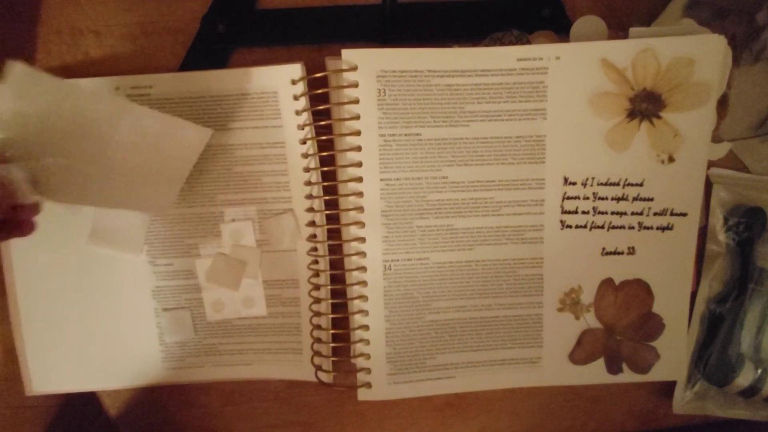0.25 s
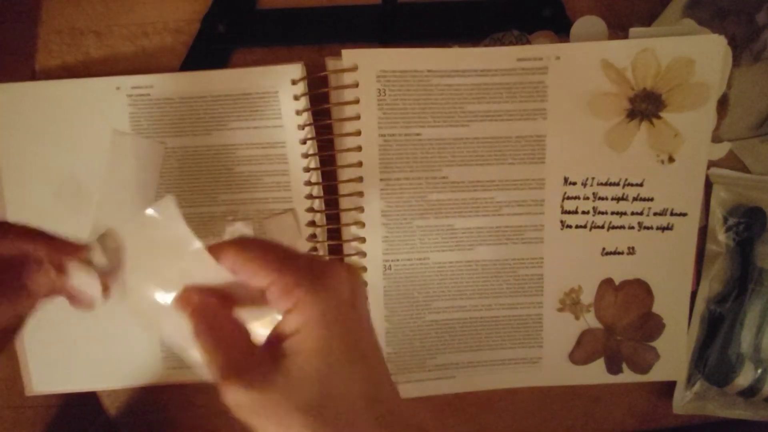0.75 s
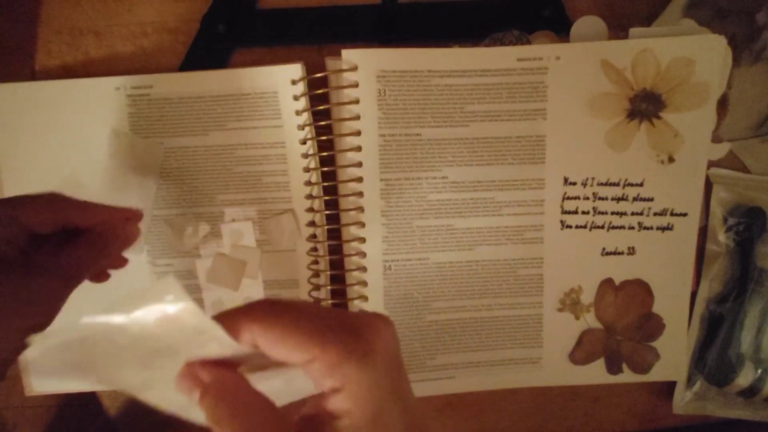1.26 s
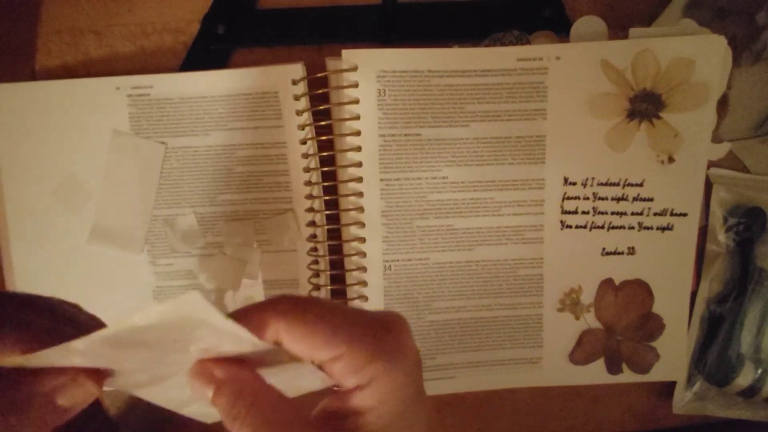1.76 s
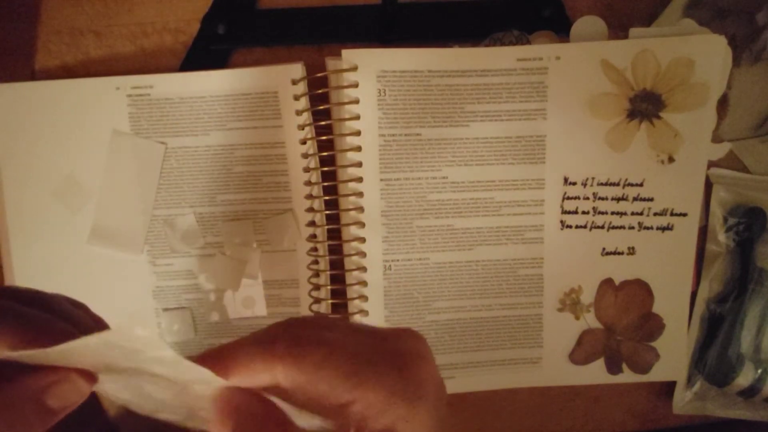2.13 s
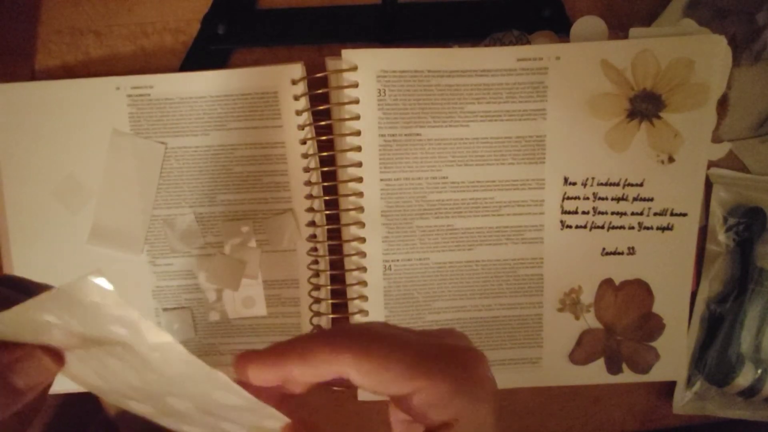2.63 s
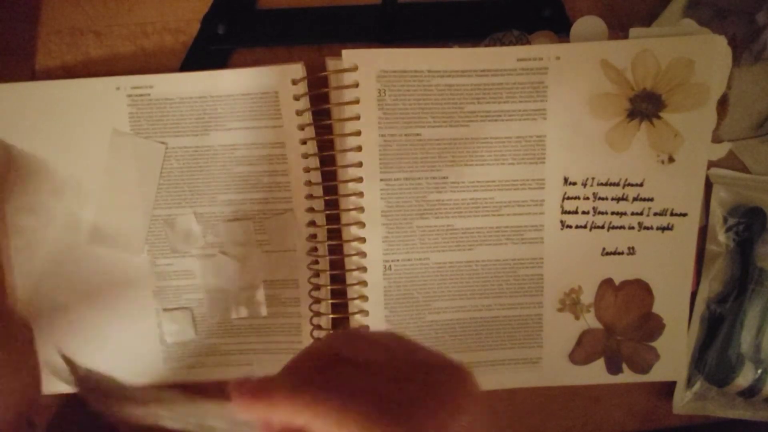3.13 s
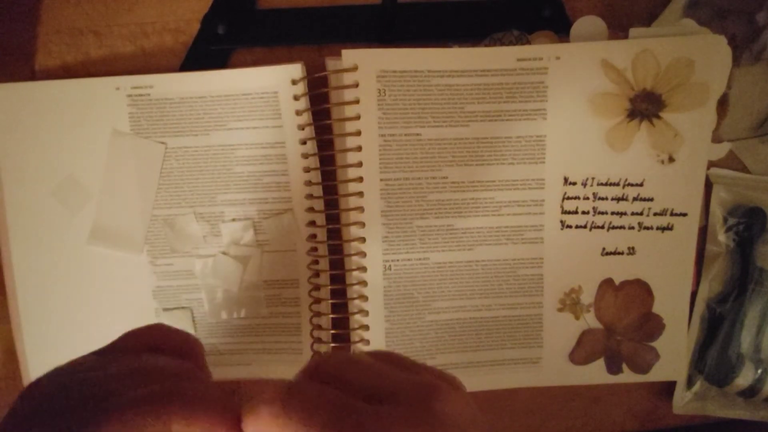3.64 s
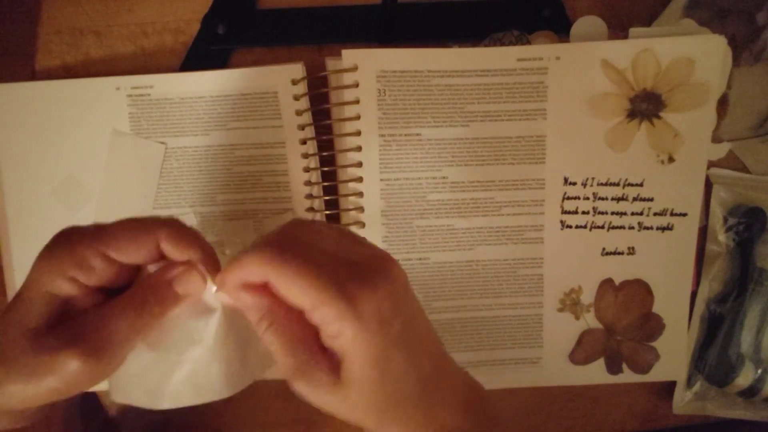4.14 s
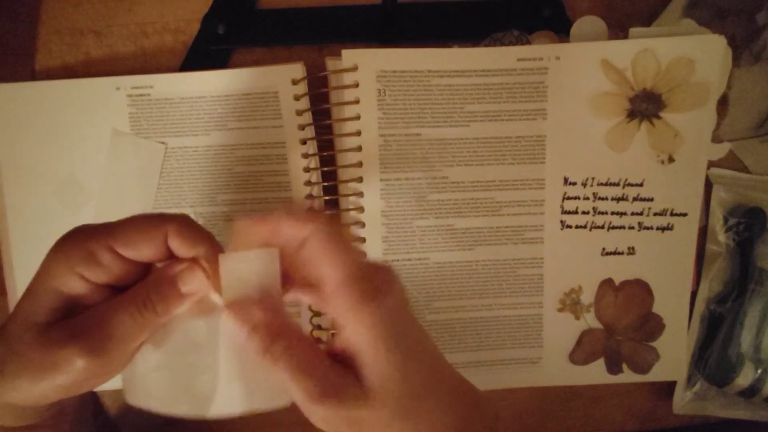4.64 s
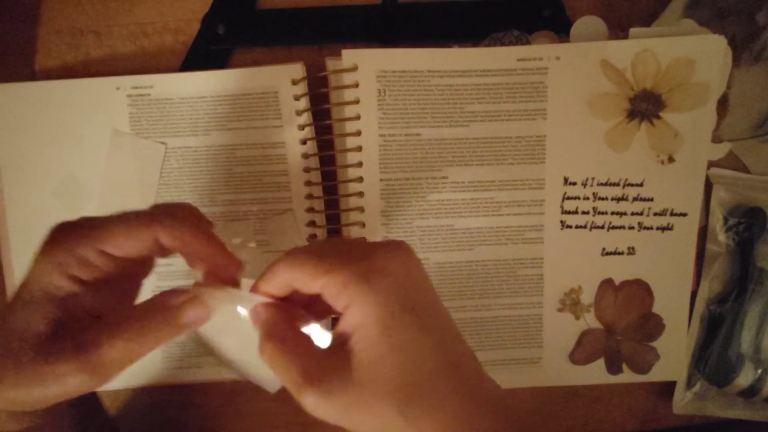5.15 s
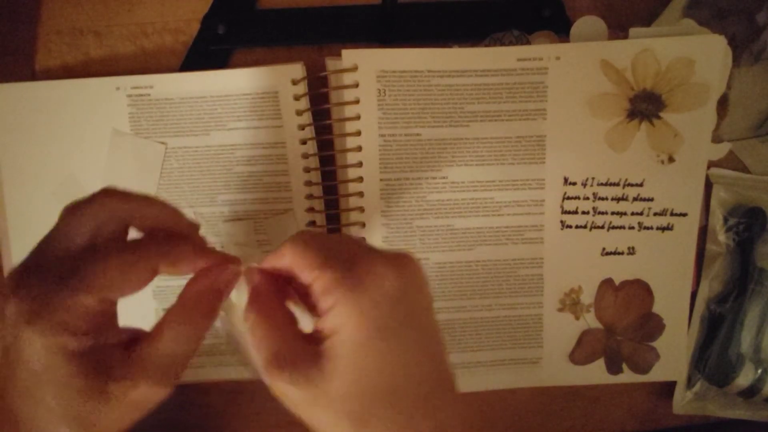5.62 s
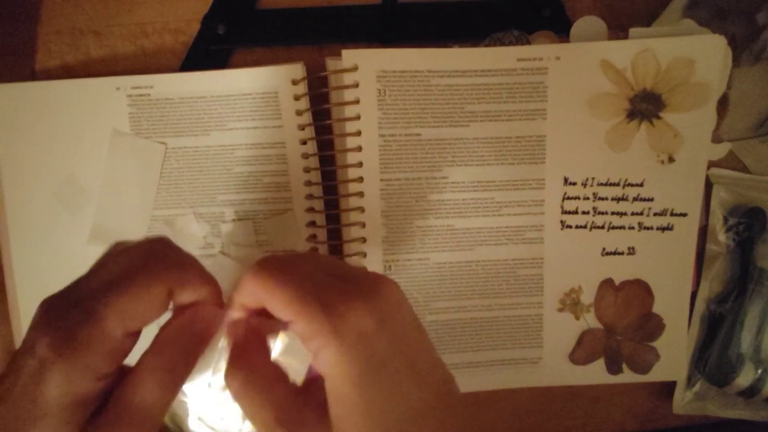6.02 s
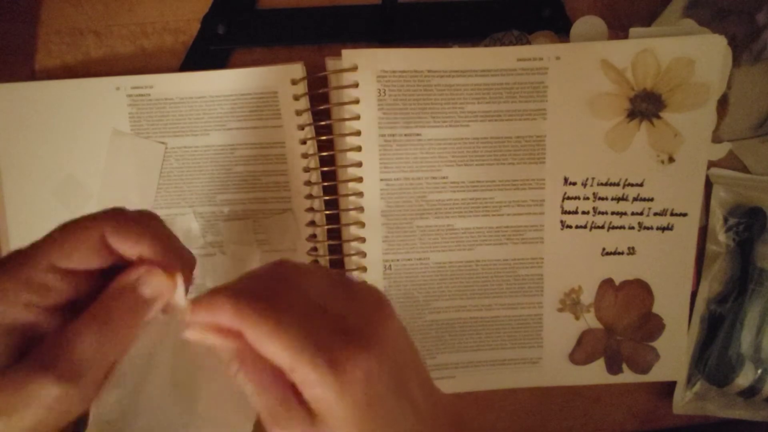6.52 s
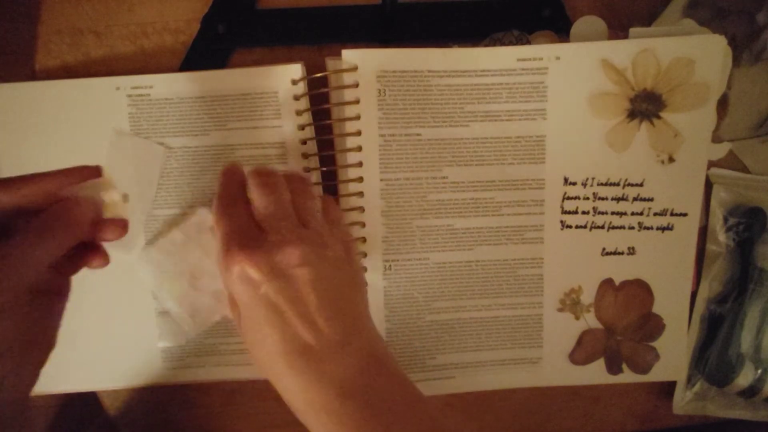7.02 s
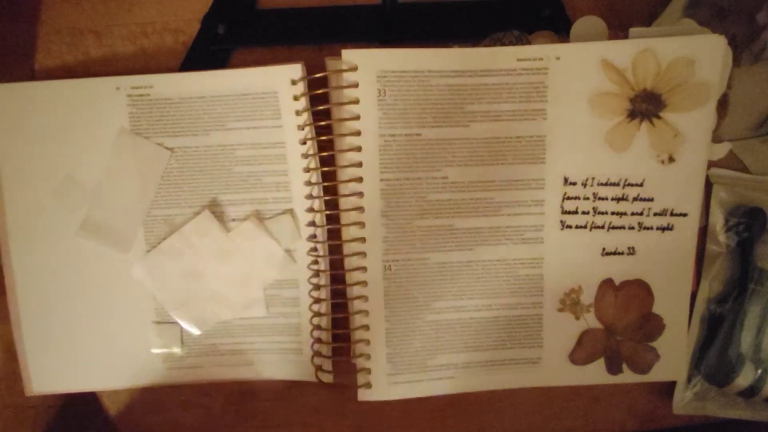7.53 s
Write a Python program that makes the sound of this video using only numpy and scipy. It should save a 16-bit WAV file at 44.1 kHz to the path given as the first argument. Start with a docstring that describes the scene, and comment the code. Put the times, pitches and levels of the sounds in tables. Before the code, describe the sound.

A faint, slightly wavering low appliance hum and soft air continue throughout in a small room with a very short echo. At 0-0.4 s there is soft hiss, finger sliding and tiny papery ticks; a small crackle cluster follows at 0.8-0.95 s, and a light dull tap on the page near 1.2 s. From 1.5 to 3.8 s it is mostly quiet, with isolated faint ticks and brushes. At 3.9-4.2 s waxy paper cracks sharply in a bright cluster, with more snaps at 4.35 and 4.6 s, the taut sheet shivering briefly. Weak ticks thin out from 4.7 to 6.1 s. The loudest crackling bursts come at 6.4 and 6.7 s, the latter with a short hollow flop. Light rustling and page taps come near 7.05 s, then a soft hiss swells around 7.6 s. Close microphone, right side stronger.

```python
"""An appliance hums throughout; from the start, soft hiss swells (filtered noise) and fingers slide on paper.
Waxy backing paper is turned over a table, picked at and peeled: creases crack and ring, singly or clustered.
From 1.2 s light taps ring the page below as short modes; from 4 s the sheet flops in two bending modes.
Around the loudest snaps, from 4.2 s, the taut sheet shivers on as decaying band noise.
A small room answers briefly throughout, and the right channel runs a few ms behind the left."""
import sys
import numpy as np
from scipy import signal
from scipy.fft import rfft, irfft
from scipy.io import wavfile
from scipy.ndimage import uniform_filter1d

SR = 44100
rng = np.random.default_rng(int(sys.argv[2]) if len(sys.argv) > 2 else 0)


def store_pcm(level_fs):
    """Save levels as 16-bit WAV."""
    pcm = np.round(np.clip(level_fs, -1, 1) * 32767).astype(np.int16)
    wavfile.write(sys.argv[1], SR, np.atleast_2d(pcm).T)


N = 342657
TIME, BINS = np.arange(N) / SR, np.fft.rfftfreq(N, 1 / SR)  # s, Hz


def gain_of(db):
    """Level law: decibels become an amplitude ratio."""
    return 10 ** (np.asarray(db) / 20)


def evened(x):
    """Power normalisation: scales to rms 1."""
    return x / np.sqrt(np.mean(x ** 2) + 1e-20)


def read(points, hz, axis=1):
    """Spectral interpolation: one table column, joined on a log-frequency axis."""
    columns = np.transpose(points)
    return np.interp(np.log(hz + 1), np.log(columns[0] + 1), columns[axis])


def add(mix, s, sound):
    """Superposition: a stereo sound is summed into the mix at time s."""
    part = mix[:, max(round(s * SR), 0):][:, :sound.shape[1]]
    part += sound[:, :part.shape[1]]


def colour(x, db):
    """Linear filtering: a whole track is weighted by a gain for each of BINS."""
    return irfft(rfft(x) * gain_of(db), N)


def causal(db):
    """Minimum phase: the spectrum with these gains that rings only after its onset."""
    both_sides = np.r_[db, db[-2:0:-1]]
    log_gain = np.log(gain_of(both_sides))
    return np.exp(np.conj(signal.hilbert(log_gain)))[:len(db)]


def paired(z, hz, apart_hz):
    """Spatial coherence: two unrelated spectra become alike in the bass, unrelated in the treble."""
    same = 1 / (1 + (hz / apart_hz) ** 2)
    left = same * z[1] + np.sqrt(1 - same ** 2) * z[0]
    return np.array([left, z[1]])


def drift(rate_hz):
    """Slow random modulation: low-passed noise of rms 1."""
    slow = np.exp(-np.minimum(BINS / rate_hz, 20) ** 2)
    return evened(irfft(rfft(rng.standard_normal(N)) * slow, N))


# room air and appliance rumble, before the swell: (frequency [Hz], spectral density [dB per Hz])
AIR_SPECTRUM = [(25, -111), (45, -111), (85, -100), (110, -92.5), (190, -95), (275, -86.5), (355, -101),
                (455, -91), (540, -102), (1000, -107), (1900, -117), (2800, -117), (7000, -128),
                (14000, -128)]
# appliance tones, before their waver: (frequency [Hz], rms level [dB])
HUM_TONES = [(58, -80), (69.3, -82), (120, -70), (174.5, -77), (218, -70), (240, -73), (285, -76.5),
             (316, -83), (405, -87), (436, -78)]


def background(waver=0.11, air_swell_db=1):
    """Tones in noise: slightly wavering appliance tones in a low, gently swelling rush of air."""
    z = paired(rfft(rng.standard_normal((2, N))), BINS, apart_hz=1200)
    air = irfft(z * gain_of(read(AIR_SPECTRUM, BINS)), N) * np.sqrt(SR / 2)
    air = air * gain_of(air_swell_db * drift(15))
    tones = 0
    for hz, db in HUM_TONES:
        level = gain_of(db) * (1 + waver * drift(4))
        turns = hz * TIME + rng.random()
        wander = waver * hz / 60 * drift(1.8)  # radians: the higher a tone, the more its phase wanders
        tones = tones + level * np.sin(2 * np.pi * turns + wander)
    return air + np.sqrt(2) * tones


# the soft hiss: (frequency [Hz], relative level [dB])
HISS_SPECTRUM = [(100, -7.5), (700, 2), (2000, -5), (4000, 4), (8000, 1.5), (11500, 2), (16000, -9.5)]
# swells of the hiss: (start of hold [s], end of hold [s], level [dB])
HISS_SWELLS = [(0, 0.352, -77), (0.59, 0.802, -79.5), (7.582, 7.77, -72)]
HISS_RAMP_S, HISS_REST_DB = 0.11, -87  # ramps lie outside each hold; the level never falls below rest


def hiss():
    """Shaped noise: independent broad hiss, alike in level on both sides, ramps up, holds and ramps down."""
    swells = 0
    for start, end, db in HISS_SWELLS:
        inside_s = np.minimum(TIME - start, end - TIME)
        swells = swells + gain_of(db) * np.clip(1 + inside_s / HISS_RAMP_S, 0, 1)
    noise = colour(rng.standard_normal((2, N)), read(HISS_SPECTRUM, BINS))
    return evened(noise) * np.maximum(swells, gain_of(HISS_REST_DB))


# strokes of fingers and paper, each with its own brightness:
# (fastest moment [s], swell [s], fade [s], relative level [dB], treble lift [dB])
STROKE_TABLE = [(0.021, 0.083, .17, -58.5, 11), (0.179, 0.036, .11, -66, 13), (0.344, .17, .07, -70, 9),
                (0.846, 0.015, 0.12, -50, -2), (1.56, 0.12, .15, -81, 13), (1.79, .03, .09, -65, -1.5),
                (2.029, 0.12, 0.063, -71, -1.5), (2.449, .09, 0.35, -77, 5.5),
                (3.093, 0.086, 0.14, -66.5, 0), (3.408, 0.15, 0.33, -62.5, -3.5), (3.81, .02, .12, -71, -1),
                (3.98, 0.032, 0.25, -37.5, 4), (4.16, 0.046, .12, -50.5, 2.5),
                (4.351, 0.032, .09, -47, 1.5), (4.56, .02, .06, -40, 1), (4.76, .08, 0.036, -61, 3),
                (5.03, 0.074, 0.06, -53.5, -0.5), (5.36, .08, 0.064, -69, -13.5),
                (5.96, 0.33, 0.19, -69.5, 2), (6.075, .02, 0.26, -61.5, 1),
                (6.39, 0.022, 0.056, -34.5, -2.5), (6.501, 0.092, 0.15, -49, 0),
                (6.708, 0.033, .08, -35.5, -4), (6.754, .04, .03, -39.5, 5), (6.979, .22, 0.13, -58.5, 3.5),
                (7.068, .03, .09, -51, 1), (7.139, .05, 0.054, -55, 6), (7.425, 0.064, 0.091, -65.5, 9)]
STROKE_DROP_DB = 20  # how far the level lies below its peak one swell before or one fade after it
STROKE_ROUND = 1.11  # 1 = a pointed swell, 2 = a rounded one


def strokes():
    """Power summation: overlapping swells and fades give the rub's gain and mean treble lift (dB)."""
    t = TIME[::64]  # slow enough for a coarse grid
    power, lift = np.full(len(t), 1e-14), np.zeros(len(t))
    for s, swell_s, fade_s, db, lift_db in STROKE_TABLE:
        away = np.maximum((s - t) / swell_s, (t - s) / fade_s)
        stroke = gain_of(db - STROKE_DROP_DB * abs(away) ** STROKE_ROUND) ** 2
        power = power + stroke
        lift = lift + stroke * lift_db
    return np.interp(TIME, t, np.sqrt(power)), np.interp(TIME, t, lift / power)


# skin and paper rubbing: (frequency [Hz], relative level [dB])
RUB_SPECTRUM = [(100, -28.5), (400, -9), (720, 7), (1200, -7.5), (1650, -9), (2300, -1), (4200, -1),
                (5600, -4.5), (8000, 1), (9600, -3.5), (11800, -1), (16000, -5)]


def sliding(rub_gain, rub_lift_db, grains_per_s=500, spread_db=7.0, smooth_db=-3, left_db=-7,
            flutter_db=2, patchy_db=3.0, trim_db=-2.5, size=256):
    """Stick-slip friction: tiny slips of skin and waxed paper, through resonances that shift as it bends."""
    sizes = gain_of(spread_db * np.minimum(rng.exponential(1, N), 3.5))
    sizes = sizes * (rng.random(N) < grains_per_s / SR)
    slips = signal.lfilter([1], [1, -np.exp(-1 / (0.0013 * SR))], sizes)  # each dies over 1.3 ms
    force = (evened(slips) + gain_of(smooth_db)) * gain_of(flutter_db * drift(35))
    hz, at, z = signal.stft(force * rng.standard_normal((2, N)), SR, nperseg=size)
    patches = uniform_filter1d(rng.standard_normal(z.shape[1:]), size=2, axis=0)  # across frequency
    patches = evened(uniform_filter1d(patches, size=16, axis=1))  # across time
    treble = read([(1000, -1.4), (3500, -0.041), (7800, 1.0), (13000, 0.27)], hz)
    lift = np.outer(treble, np.interp(at, TIME, rub_lift_db))
    gain = gain_of(read(RUB_SPECTRUM, hz)[:, None] + lift + patchy_db * patches)
    gain /= np.sqrt((gain ** 2).mean(0))  # colour alone changes, not the level
    rub = evened(signal.istft(z * gain, SR, nperseg=size)[1][:, :N])
    return rub * rub_gain * gain_of([[left_db + trim_db], [trim_db]])


# the room's bands: (frequency [Hz], relative echo level [dB], t60 [s])
ROOM_BANDS = [(150, -14.5, 0.14), (898, -13, 0.15), (1900, -13.5, 0.2), (3080, -8.5, 0.14), (4100, -9, 0.2),
              (5070, -12, 0.21), (7480, -11.5, 0.21), (11940, -12.5, 0.18), (16250, -20.5, 0.2)]


def room(x, build_s=0.0094, size=128):
    """Reverberation: reflections thicken over hundredths of a second; each band dies at its own speed."""
    t = np.arange(SR // 2) / SR
    strong = rng.standard_normal((2, len(t)))
    reflections = strong * (0.68 + 1.3 * (rng.random((2, len(t))) < .03))  # a few stand out
    hz, at, z = signal.stft(reflections * (1 - np.exp(-(t / build_s) ** 2)), SR, nperseg=size)
    decay = gain_of(-60 * at / read(ROOM_BANDS, hz, axis=2)[:, None])
    tail = signal.istft(z * decay, SR, nperseg=size)[1]
    tail /= np.linalg.norm(tail, axis=1, keepdims=True)
    echo = signal.fftconvolve(x[None], tail, axes=1)[:, :N]
    return colour(echo, read(ROOM_BANDS, BINS))


# tiny creases give way during every stroke; they grow slightly more slowly than the rub does
CRINKLE_DB, CRINKLE_SPREAD_DB, CRINKLE_GROWTH = -54, 2.5, 0.99  # growth: dB per dB of rub
CRINKLE_AT_RUB_DB = -60  # the rub level at which CRINKLE_DB holds
CRINKLE_PAN_DB, CRINKLE_RING_DB = -10, 17
CRINKLE_LOW_HZ, CRINKLE_HIGH_HZ = 3000, 8800


def crinkles(rub_gain, count=2, reach=0.68):
    """Crackling: tiny creases at random moments of each stroke, as rows like those of CREASE_SNAPS."""
    rows = []
    draws_by_stroke = rng.random((len(STROKE_TABLE), count, 3))
    for (s, swell_s, fade_s, _, _), draws in zip(STROKE_TABLE, draws_by_stroke):
        for when, strength, facet in draws:
            at = max(s + reach * (when * (swell_s + fade_s) - swell_s), 0)
            rub_db = 20 * np.log10(np.interp(at, TIME, rub_gain))
            db = CRINKLE_DB + CRINKLE_GROWTH * (rub_db - CRINKLE_AT_RUB_DB)
            db += CRINKLE_SPREAD_DB * (2 * strength - 1)
            ring_hz = CRINKLE_LOW_HZ + facet * (CRINKLE_HIGH_HZ - CRINKLE_LOW_HZ)
            rows.append((at, db, 0, 0, CRINKLE_PAN_DB, ring_hz, CRINKLE_RING_DB))
    return rows


# single creases snapping through, faint to loud: (time [s], relative level [dB], body tilt up to 1100 Hz [dB],
# edge tilt from 8000 Hz [dB], left minus right [dB], facet ring [Hz], ring height before facet scaling [dB])
CREASE_SNAPS = [(0.1097, -51, 14, -7, -6, 970, 1), (0.1491, -45.5, 4, 13, -12, 8040, 30),
                (0.1723, -39, 2, -5, -11, 7960, 14.5), (0.3645, -61, -13, -3, -1, 3960, 15),
                (0.8325, -42, 11, -1, -7, 780, 13), (0.8422, -38.5, 4, -8, -7, 750, 14),
                (0.848, -37, -11, -11, -11, 5050, 5), (0.9106, -44, -7, -1, -11, 2320, 14),
                (0.9435, -44, 1, -13, -7, 2560, 15), (1.0826, -51.5, -2, -6, -7, 8800, 15),
                (1.7925, -46, -6, -13, -5, 2420, 11.5), (1.8122, -45, -1.5, -13, -10.5, 680, 12),
                (2.2367, -43.5, -0.5, -7.5, -11, 4800, 14.5), (3.149, -64, 0, -19, -8, 2980, 15),
                (3.4065, -50, -5, -5, -5, 8400, 9), (3.4569, -56, -8, -14, -1, 735, 20.5),
                (3.801, -43.5, 1, 23, -4.5, 8000, -2), (3.9055, -32, -34, 8.5, -6, 8900, 12),
                (3.9638, -36.5, -17, -2, -1, 3390, 13), (3.9787, -18, -9.5, -4, -1, 3560, 5),
                (4.0099, -21.5, -7, -4.5, -1.5, 3620, 4), (4.0468, -34.5, 25, -4, -10, 754, 19),
                (4.0646, -18, -5, 1.5, -8.5, 5060, 15.5), (4.0873, -16.5, -12, -2, -6, 6380, 6.5),
                (4.1524, -37.5, -9, 1, -7.5, 5020, 8), (4.1736, -19.5, -8, -2.5, -6.5, 3780, 8),
                (4.3477, -18, -9.5, -3.5, -0.5, 4870, 5.5), (4.3847, -25.5, -3, -4, -8, 2660, 10.5),
                (4.5587, -25.5, -11, -5, -6, 3880, 9.5), (4.6, -23, -4, -2, -6, 3040, 9.5),
                (4.7348, -45.5, -0.5, -18, -5, 2700, 20), (4.7734, -39.5, -7, 7, -13, 8500, 13),
                (4.8434, -36, -14, -7, -9, 11600, 15.5), (4.9295, -37.5, 2, -12, -7.5, 2190, 25.5),
                (5.0029, -44, 12, 0, -18, 8500, 15), (5.0209, -36, 8, -4.5, -8, 708, 11.5),
                (5.3562, -36.5, -2.5, -4, -9.5, 4260, 15.5), (5.785, -54.5, -13, -0.5, -6.5, 4200, 4),
                (6.0664, -39.5, -7, -4, -10.5, 3200, 10), (6.1415, -41.5, 15, 6.5, -9, 7570, 17),
                (6.3852, -17, -6.5, -7, -2.5, 8600, 12), (6.4114, -19, 5.5, 2, -12, 8110, -3),
                (6.4154, -13.5, 2, 3, -4, 8160, 4.5), (6.4245, -13, -1.5, -1.5, -6, 3120, 11),
                (6.4294, -32, -7, 1, 7, 4000, 11), (6.6865, -20.5, 8.5, -1.5, -8.5, 8170, 14.5),
                (6.7044, -20, -4, -9, -13, 580, 12), (6.7178, -18.5, -3, -8.5, -7.5, 600, 6),
                (6.7222, -16, -1, -4, -2.5, 3040, 8.5), (6.7535, -31, -5, -8, -4, 7500, 7),
                (6.7641, -28.5, 7, 2, -6, 2770, 15.5), (7.046, -40, 5, 11, -14, 8160, 8),
                (7.067, -38.5, -8, 10, -8, 950, 19), (7.1381, -45.5, -1.5, -2, -16, 8460, 17)]
# a crease's crack: (frequency [Hz], relative level [dB])
CRACK_SPECTRUM = [(40, -17.5), (120, 1), (250, -1.5), (600, 0.5), (1000, 2), (1550, 0.5), (2200, -3.5),
                  (3200, -2.5), (5000, -1), (7500, 0.5), (11500, 6), (16000, -2.5)]


def snaps(creases, facet=1, size=2048, crack_s=0.00038, left_crack_s=0.00093, shiver_s=0.0043,
          shiver_db=-15, rise_s=0.00016, ring_q=8, small_bass_db=-16, small_top_db=-6,
          bounce_db=-5, bounce_s=0.000905, trim_db=0.64):
    """Impulsive buckling: a crease gives way in a brief crack, then the facet beside it resonates."""
    out, t, hz = np.zeros((2, N)), np.arange(size) / SR, np.fft.rfftfreq(size, 1 / SR)
    crack = np.exp(-t / np.array([[left_crack_s], [crack_s]]))
    shape = (1 - np.exp(-t / rise_s)) * (crack + gain_of(shiver_db) * np.exp(-t / shiver_s))
    noises = rng.standard_normal((len(creases), 2, size))
    delays = bounce_s * (.5 + rng.random(len(creases)))
    small_colour = read([(300, small_bass_db), (650, 4), (1100, -4.0), (2000, 0), (9000, 1.5),
                         (12000, small_top_db)], hz)
    for (s, db, body_db, edge_db, pan_db, ring_hz, ring_db), fibres, delay in zip(creases, noises, delays):
        z = rfft(fibres * shape)
        z = z / np.sqrt(uniform_filter1d(abs(z) ** 2, size=96, axis=1))  # flattens the broad spectrum
        z = paired(z, hz, apart_hz=4450)
        # a bounce off the hand or the page combs each snap differently
        bounce = gain_of(bounce_db) * np.exp(-2j * np.pi * hz * delay) / (1 + (hz / 6000) ** 2)
        z = z * (1 - bounce)
        tilt = read([(1100, body_db), (2700, 0.0027), (4600, 0.0032), (8000, edge_db)], hz)
        # only a strong snap moves the whole sheet and has a hard front: small ones lack bass and top
        small = np.interp(db, [-38, -24], [1, 0]) * small_colour
        resonance = 1 + (2 * ring_q * (hz / ring_hz - 1)) ** 2
        ring = 10 * np.log10(1 + (gain_of(facet * ring_db) ** 2 - 1) / resonance)
        snap = irfft(z * causal(read(CRACK_SPECTRUM, hz) + tilt + small + ring))
        snap *= np.sqrt(SR / 1000 / (snap ** 2).sum(1, keepdims=True))  # the energy of 1 ms at rms 1
        add(out, s, snap * gain_of([[db + pan_db], [db]]))
    return out * gain_of(trim_db)


# light taps on the page below: (time [s], relative level [dB], extra level of modes over 1500 Hz [dB])
PAGE_TAPS = [(1.174, -41.5, -8), (1.184, -50, -11), (7.0593, -40.5, 6), (7.0634, -37.5, 9)]
# what the page rings with: (frequency [Hz], relative level [dB], t60 [s])
PAGE_MODES = [(905, -16, 0.057), (965, 3, 0.025), (1110, -31, 0.023), (1460, 2, 0.0074),
              (1800, -15.5, 0.03), (2378, -14, 0.032), (2460, -17, 0.02), (4500, -13, 0.015)]


def taps(left_db=-5, contact_s=0.00072):
    """Modal excitation: a soft contact sets the page's few short modes ringing."""
    out, t = np.zeros((2, N)), np.arange(SR // 10) / SR
    for s, db, upper_db in PAGE_TAPS:
        ring = 0
        for hz, mode_db, t60 in PAGE_MODES:
            decay = gain_of(mode_db + upper_db * (hz > 1500) - 60 * t / t60)
            ring = ring + decay * np.sin(2 * np.pi * (hz * t + rng.random()))
        add(out, s, ring * (1 - np.exp(-t / contact_s)) * gain_of([[db + left_db], [db]]))
    return out


# the whole sheet flopping over: (time [s], pitch [Hz], relative level [dB], time scale of swing [s])
SHEET_FLOPS = [(3.9779, 141, -35.5, 0.0017), (4.086, 129, -36.5, 0.0032), (4.3475, 583, -24.5, 0.00051),
               (6.4255, 407, -35, 0.0015), (6.7042, 517, -17, 0.0014), (6.7172, 378, -26.5, .0024)]


def flops(order=3, left_db=-5, overtone=3.3, overtone_db=-9):
    """Damped bending: the sheet's two lowest modes swing briefly and are stopped by the fingers."""
    out, t = np.zeros((2, N)), np.arange(SR // 20) / SR
    for s, hz, db, decay_s in SHEET_FLOPS:
        modes = np.sin(2 * np.pi * hz * t)
        modes = modes + gain_of(overtone_db) * np.sin(2 * np.pi * overtone * hz * t)
        age = t / decay_s
        swing = modes * age * np.exp(1 - age - (age / order) ** 2)
        add(out, s, swing * gain_of([[db + left_db], [db]]))
    # the swings keep no deep bass below about 110 Hz
    return signal.sosfilt(signal.butter(2, 110, "high", fs=SR, output="sos"), out)


# the taut sheet shivering on after hard snaps: (time [s], relative level [dB], t60 [s])
SHEET_SHIVERS = [(4.177, -45.5, 0.22), (4.351, -44.5, 0.22), (4.599, -42.5, 0.13), (6.426, -37, 0.24)]
# its crowded modes: (frequency [Hz], relative level [dB])
SHIVER_SPECTRUM = [(1500, -39.5), (2400, -8), (2850, -1.5), (3400, -0.5), (4050, 2), (4600, -14.5),
                   (7000, -40)]


def shivers(rise_s=0.0033, left_db=0.0, flutter_db=2):
    """High modal density: crowded modes of the stretched sheet, as band noise, die away unevenly."""
    level = 0
    for s, db, t60 in SHEET_SHIVERS:
        decay = gain_of(db - 60 * np.maximum(TIME - s, 0) / t60)
        level = level + decay * np.clip((TIME - s) / rise_s, 0, 1)
    modes = evened(colour(rng.standard_normal((2, N)), read(SHIVER_SPECTRUM, BINS)))
    return modes * level * gain_of(flutter_db * drift(120)) * gain_of([[left_db], [0]])


def scene():
    """Superposition: the handled paper, its echo, and the room's background."""
    rub_gain, rub_lift_db = strokes()
    creases = list(CREASE_SNAPS) + crinkles(rub_gain)
    handling = flops() + taps() + sliding(rub_gain, rub_lift_db)
    # a facet beams its ring; the room gets a broader snap
    all_round = snaps(creases, facet=0.81) + handling
    echo = room(all_round[1] + .5 * all_round[0]) * gain_of([[-4], [-2.5]])
    return snaps(creases) + handling + shivers() + echo + hiss() + background()


# recording colour: (frequency [Hz], left [dB], right [dB])
CHANNEL_COLOUR = [(2000, 1, 1.5), (5100, 0, 1.5), (7800, -2, 1.5), (8640, -9, 4), (9600, 0, -8.5),
                  (12140, 1, -2.5), (12250, -12, -12.5), (15500, -12.5, -22)]
RIGHT_LAG = 165  # samples
EDGE_HZ = 16400  # upper band limit


def record(dry):
    """Linear filtering and delay: each channel's colour, the late right channel, and the band limit."""
    left = colour(dry[0], read(CHANNEL_COLOUR, BINS))
    right = colour(dry[1], read(CHANNEL_COLOUR, BINS, axis=2))
    pair = np.array([left, np.roll(right, RIGHT_LAG)])
    low_pass = signal.firwin(511, EDGE_HZ, window=("kaiser", 9), fs=SR)
    return signal.oaconvolve(pair, low_pass[None], "same", axes=1)


dry = scene()
out = record(dry)
store_pcm(out)
```